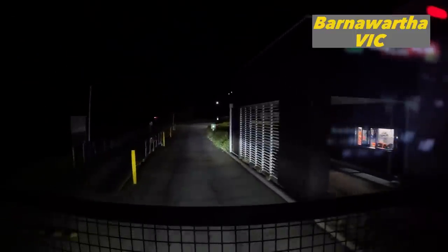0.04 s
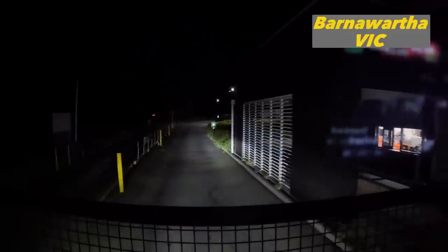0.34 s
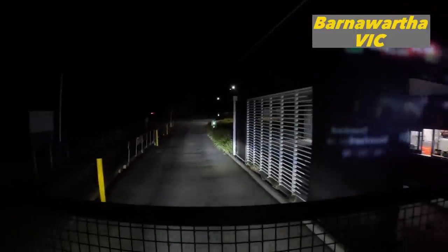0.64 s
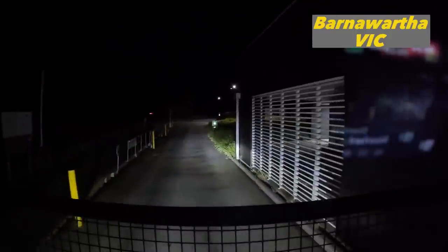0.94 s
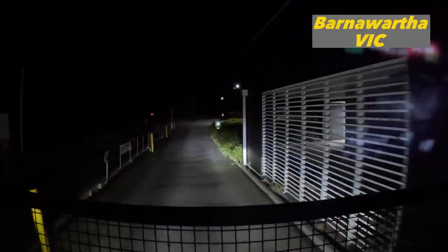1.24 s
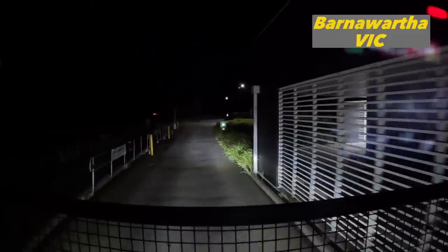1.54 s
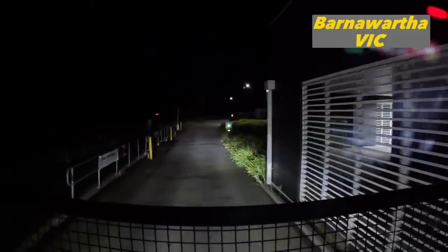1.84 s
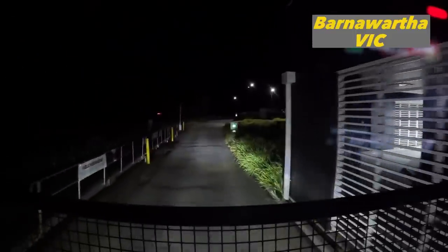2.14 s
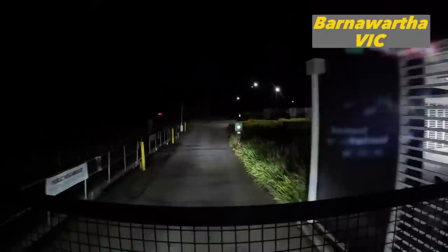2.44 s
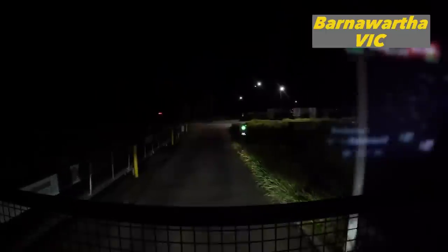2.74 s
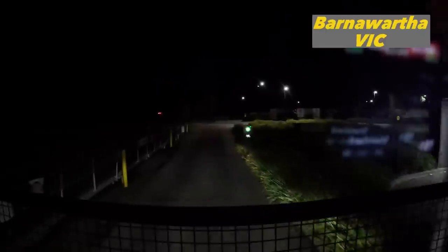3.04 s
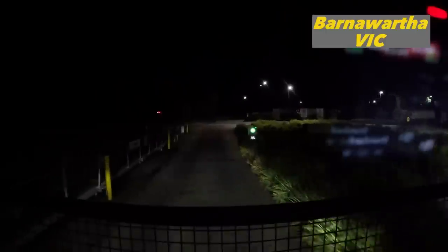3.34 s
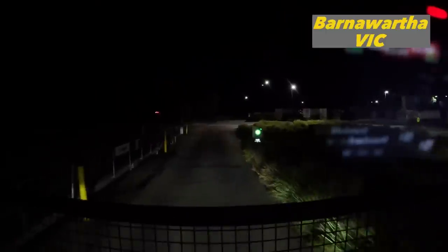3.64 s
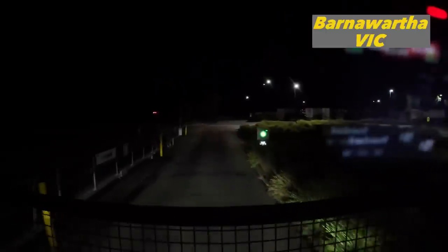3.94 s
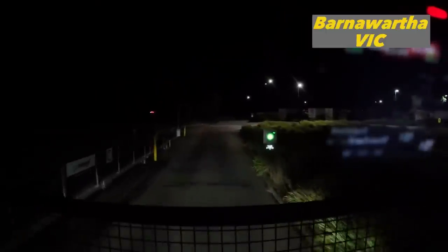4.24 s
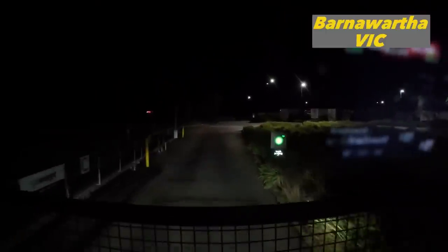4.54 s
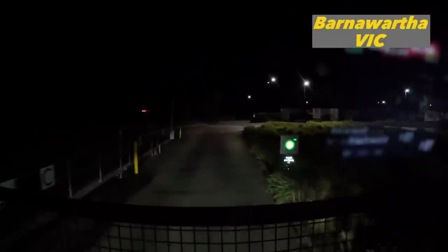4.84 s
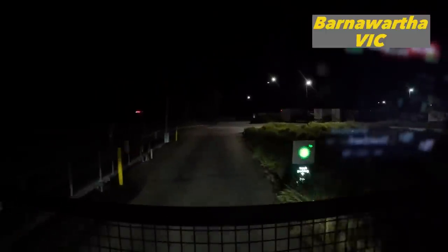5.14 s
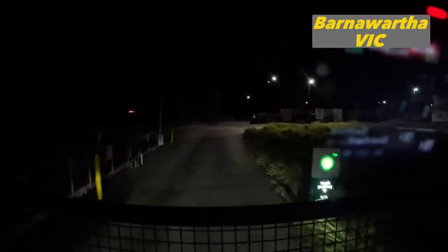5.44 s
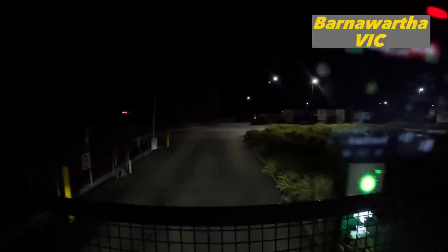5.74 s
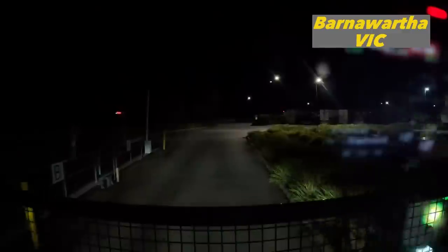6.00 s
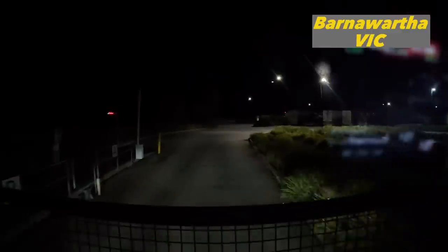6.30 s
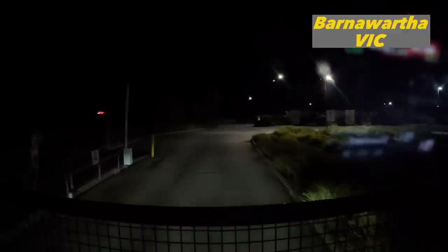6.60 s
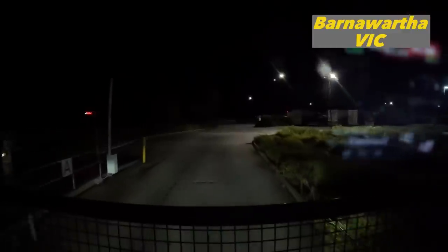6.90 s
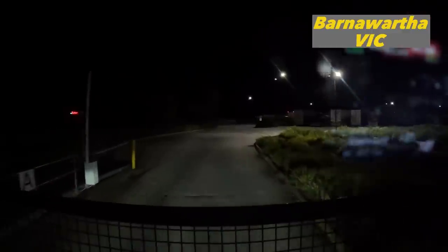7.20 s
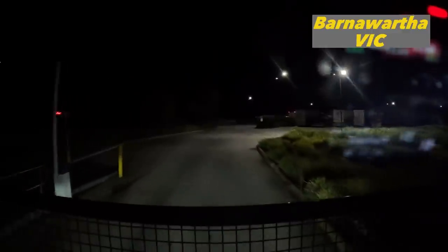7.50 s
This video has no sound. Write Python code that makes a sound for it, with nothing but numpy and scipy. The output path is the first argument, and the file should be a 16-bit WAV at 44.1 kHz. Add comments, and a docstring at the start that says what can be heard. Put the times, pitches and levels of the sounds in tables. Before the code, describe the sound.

Inside a slow-moving truck, a deep diesel hum rises slightly and grows more clattery, with light knocks and two short air hisses.

```python
"""Six-cylinder diesel of a heavy truck creeping along a yard road at night, heard in the cab.
It speeds up a little and clatters harder under load; firing pulses and gear whines excite cab resonances.
A second, governed engine (probably a cooling unit) drones steadily and beats against it.
Loose fittings click, knock and jingle as the cab sways; air hisses twice.
Late on, a low rumble and a faint whistle swell, something slides, and there is one thin squeak."""
import sys
import numpy as np
from scipy import signal
from scipy.fft import rfft, irfft, next_fast_len
from scipy.io import wavfile
from scipy.ndimage import uniform_filter1d, minimum_filter1d

SR = 44100
rng = np.random.default_rng(int(sys.argv[2]) if len(sys.argv) > 2 else 0)


def to_wav(s):
    """Save 16-bit WAV."""
    ch = np.atleast_2d(s).T  # columns
    pcm = np.round(np.clip(ch, -1, 1) * 32767)  # PCM
    wavfile.write(sys.argv[1], SR, pcm.astype(np.int16))


N = 337806
TIME_S = np.arange(N) / SR
BINS_HZ = np.maximum(np.fft.rfftfreq(next_fast_len(N), 1 / SR), 1)

# diesel firing rate, sagging as load comes on: t/s, f/Hz
FIRING_HZ = [(0, 64.33), (0.5, 64.42), (1.3, 65.95), (2.4, 66.42), (3.9, 68.9), (4.7, 69.7), (5.15, 68.7),
             (5.7, 69.85), (7.2, 68.4), (7.66, 68.5)]
# diesel load: t/s, load (0 light, about 1 full)
LOAD = [(0, 0.051), (.5, 0.24), (3.4, 0.1), (4, 0.069), (4.66, .06), (4.96, 0.97), (7.66, 1.08)]
# cab air resonances: firing multiple, f/Hz, width/Hz, level/dB, change at full load/dB
BOOM_MODES = [(1, 65.9, 1.1, -25.5, -3), (2, 128.7, 0.92, -29, -8.5), (2, 138.6, 1.7, -32, 1),
              (3, 197.2, 7.9, -27.5, -8), (4, 266.5, 8.3, -41.5, -5.5)]
# diesel tones: four-stroke cycle multiple, relative level/dB at low speed, at high speed
ENGINE_ORDERS = [(2, -31, -33), (3, -39, -40), (4, -34, -40), (7, -32, -32), (8, -35, -36), (9, -39, -36),
                 (10, -38, -36), (14, -38, -42), (15, -43, -48), (16, -39, -45), (20, -52, -50),
                 (22, -46, -48), (23, -46, -51), (25, -52, -50), (26, -52, -50), (27, -52, -58)]
LOW_FIRING_HZ, HIGH_FIRING_HZ = 66.27, 71.4
# gear and accessory whines: cycle multiple, resonance f/Hz, width/Hz, level/dB, change at full load/dB
WHINES = [(32, 345, 5, -48, 0), (35, 406, 16, -44.5, -0.5), (40, 433, 6, -44.5, 0), (45, 505, 7, -50.5, -3),
          (47, 550, 4, -55, 7), (56, 640, 12, -50.5, -4), (57, 664, 5, -52, 7), (63, 731, 7, -57, 10),
          (76, 848, 13, -52.5, -6), (90, 1032, 6, -63, 12), (98, 1135, 14, -63, 7.5),
          (114, 1301, 13, -63, 8)]
# knock per cylinder, in firing order: relative level/dB
CYLINDER_DB = [0, -4, -6, -3, -8, -7]
CYLINDERS = len(CYLINDER_DB)
# engine and road noise spectrum: f/Hz, level/dB at light load, at full load
ROAR_SPECTRUM = [(9.9, -55, -48), (20, -49, -31.5), (35, -49, -54.5), (74, -48.5, -51.5), (130, -54, -50),
                 (239, -59, -57.5), (382, -67, -64.5), (457, -67.5, -67), (820, -71, -68),
                 (1260, -76.5, -70.5), (2070, -83.5, -74.5), (2590, -95.5, -80.5), (3100, -95, -82.5),
                 (3830, -99, -89.5), (4200, -102, -99), (5370, -105.5, -102), (6600, -108, -105),
                 (9900, -113, -111), (10000, -121, -113), (15000, -140, -132)]
# cab panel peaks and dips on the roar: f/Hz, width/Hz, gain/dB
CAB_MODES = [(425, 14, 5), (500, 9, 4.5), (530, 12, -3), (635, 14, 4), (852, 14, 2), (932, 18, 3),
             (1288, 18, 2.5), (1372, 18, -3)]
# intake hiss, rising a little after the load: t/s, level/dB
INTAKE_DB = [(0, -67.5), (1.3, -67), (1.9, -77), (4.85, -71), (5.2, -62), (6.25, -63.5), (6.7, -59.5),
             (7.66, -61.5)]
# spectrum of intake hiss and slide: f/Hz, gain/dB
THIN_HISS_SPECTRUM = [(2000, -21), (4200, 0.5), (5500, 0), (7500, -8.5), (9800, -9.5), (11000, -18),
                      (14500, -28.5)]
# governed engine tones: firing multiple, level/dB
DRONE_ORDERS = [(0.5, -44), (1, -17.5), (2, -23), (2.5, -45.5), (3, -36.5), (3.5, -45.5), (4, -46.5)]
# hard plastic clicks: t/s, relative level/dB
CLICKS = [(0.462, -41.5), (0.9274, -47), (5.5972, -43), (7.4101, -42)]
# plastic resonances: f/Hz, width/Hz, gain/dB
CLICK_MODES = [(5460, 500, 7), (7100, 900, -2.5), (9000, 800, -6), (9800, 420, -8.5), (11700, 900, -13.5)]
# fitting knocks, levels relative: t/s, level/dB, t60/s, snap re level/dB, ring f/Hz, ring/dB, clack f/Hz
KNOCKS = [(0.598, -52, 0.19, -13, 745, -46, 3720), (0.9772, -55, 0.16, -12, 930, -43, 5600),
          (1.0355, -52, 0.13, -19, 796, -40, 4800), (1.305, -46.5, 0.091, -12, 853, -43, 4470),
          (1.853, -45.5, 0.22, -9.5, 1093, -37.5, 5500), (2.0125, -41, 0.18, -15, 710, -34, 8900),
          (2.029, -57.5, 0.11, -4, 917, -39, 6200), (2.063, -62, 0.09, -11, 1360, -46, 6900),
          (2.552, -45.5, 0.19, -9.5, 1097, -42, 6350), (2.586, -48, 0.14, -9, 745, -34.5, 6360),
          (2.695, -42.5, 0.11, -9, 686, -36.5, 4970), (2.708, -49, .14, -6, 1010, -37, 9100),
          (2.7435, -50.5, 0.18, -23, 673, -39, 2600), (2.806, -58, .1, -8, 890, -47, 5600),
          (3.282, -48, 0.089, -18, 1112, -36.5, 2300), (4.441, -47, 0.14, -16, 1090, -42, 4850),
          (4.722, -54, 0.2, -20, 920, -47, 3300), (4.758, -52, 0.24, -24, 647, -34.5, 4400),
          (4.827, -49.5, 0.25, -9, 1000, -46, 3900), (6.0432, -47, 0.086, -20, 1120, -48, 4640)]
# dull body of a knock: f/Hz, gain/dB
KNOCK_SPECTRUM = [(400, 0.5), (1200, 16.5), (2500, 8), (3500, 3), (5000, 1.5), (6500, -6.5), (8500, -17),
                  (11500, -26.5), (14500, -31.5)]
# bright snap of a knock: f/Hz, gain/dB
SNAP_SPECTRUM = [(3500, -25), (6000, 1), (8000, 0.5), (9600, -1.5), (11000, -12), (14500, -16)]
# hollow panel rung by the knocks: f/Hz, width/Hz, gain/dB
PANEL_MODES = [(720, 35, 0), (926, 30, -8), (1120, 45, -8), (1410, 45, -11), (2450, 200, -15)]
# jingles of a small metal part: t/s, relative level/dB
JINGLES = [(0.9, -54), (3.0135, -55), (3.7559, -52), (3.8526, -48), (4.4144, -49.5), (4.6967, -49),
           (5.2919, -47)]
# its resonances: f/Hz, width/Hz, gain/dB
JINGLE_MODES = [(5800, 450, -5), (7480, 260, -1.5), (9300, 500, -15), (11900, 700, -21)]
# air puffs: centre t/s, level/dB
PUFFS = [(3.15, -55), (3.455, -49)]
# puff spectrum: f/Hz, gain/dB
PUFF_SPECTRUM = [(1000, -17), (2200, 6.5), (3600, -1), (4700, -6), (5400, -10), (6500, -12), (7600, -7),
                 (8900, -16), (9800, -8.5), (11000, -20.5), (14500, -25)]
# whistling resonances in a puff: f/Hz, width/Hz, gain/dB
PUFF_MODES = [(2240, 50, 12), (4070, 70, 9), (5300, 160, 3.5)]
# bands of tyre rumble and whistle (probably the turbocharger): f/Hz, width/Hz, level/dB
RUSH_BANDS = [(232, 130, -34.5), (1311, 28, -47), (1485, 70, -53)]
# sliding object: centre t/s, length/s, level/dB
SLIDE = (6.71, .1, -57.5)
# squeak: centre t/s, sigma/s, f/Hz, width/Hz, left level/dB
SQUEAK = (7.5, .035, 13800, 1000, -63)
# cab diffuseness: f/Hz, side minus mid/dB
SIDE_DB = [(60, -13), (100, -15), (180, -14.5), (320, -15), (550, -13), (950, -12), (1660, -12),
           (2880, -5.5)]
# microphone sensitivity: f/Hz, left minus right/dB
BALANCE_DB = [(60, -0.5), (110, -0.5), (220, -0.5), (420, 0.0), (790, 0.5), (1510, 0.5), (2880, -1.5)]


def from_db(db):
    """Decibels to gain."""
    return 10 ** (np.asarray(db) / 20)


def unit_rms(x):
    """Scale to rms 1."""
    return x / np.sqrt(np.mean(x ** 2) + 1e-20)


def curve(rows):
    """Value per sample from (t/s, value) rows."""
    return np.interp(TIME_S, *np.transpose(rows))


def slopes(points):
    """Gain per bin from (f/Hz, gain/dB) points."""
    hz, db = np.transpose(points)
    return from_db(np.interp(np.log(BINS_HZ), np.log(hz), db))


def resonances(modes):
    """Gain per bin from (f/Hz, width/Hz, gain/dB) peaks."""
    return sum(from_db(db) / (1 + ((BINS_HZ - hz) / width_hz) ** 2) for hz, width_hz, db in modes)


def on_resonance(hz, centre_hz, width_hz):
    """Gain of a tone near a resonance; 1 at the centre."""
    return 1 / np.sqrt(1 + ((hz - centre_hz) / width_hz) ** 2)


def colour(x, gain):
    """Filter by a gain per bin."""
    return irfft(rfft(x, next_fast_len(N)) * gain, next_fast_len(N))[..., :N]


def drift(rate_hz):
    """Low-passed random wander, rms 1."""
    hop, settle = 100, 2000
    pole = np.exp(-2 * np.pi * rate_hz * hop / SR)
    white = rng.standard_normal(N // hop + settle + 2)
    slow = signal.lfilter([1], [1, -2 * pole, pole * pole], white)[settle:]
    return np.interp(np.arange(N) / hop, np.arange(len(slow)), unit_rms(slow))


def in_cab(mid):
    """Reflections make left and right of a white noise differ, most in the treble."""
    side = colour(rng.standard_normal(N), slopes(SIDE_DB))
    return np.array([mid + side, mid - side])


def cab_noise(gain):
    """Coloured stereo noise spread by the cab, rms 1."""
    return unit_rms(colour(in_cab(rng.standard_normal(N)), gain))


def firing_boom(firing_rad, firing_hz, flutter_db=1.5):
    """Four firing harmonics of alternating sign; each booms on a cab air resonance."""
    out = np.zeros(N)
    for order, hz, width_hz, db, load_db in BOOM_MODES:
        level_db = db + load_db * curve(LOAD) + flutter_db * drift(1.6)
        gain = from_db(level_db) * on_resonance(order * firing_hz, hz, width_hz)
        out -= gain * (-1) ** order * np.sin(order * firing_rad)
    return np.sqrt(2) * out


def engine_tones(cycles, firing_hz, wander_cycles=0.0013, gain_db=2.07):
    """Boom plus the other cycle multiples, from unequal cylinders; speed shifts their balance."""
    speed = np.clip((firing_hz - LOW_FIRING_HZ) / (HIGH_FIRING_HZ - LOW_FIRING_HZ), 0, 1)
    cycle_rad = 2 * np.pi * (cycles + wander_cycles * drift(1.3))   # uneven crank
    out = firing_boom(CYLINDERS * cycle_rad, firing_hz)
    for order, low_db, high_db in ENGINE_ORDERS:
        level_db = low_db + speed * (high_db - low_db) + gain_db
        out += np.sqrt(2) * from_db(level_db) * np.cos(order * cycle_rad + rng.uniform(0, 2 * np.pi))
    return out


def gear_whines(cycles, firing_hz, flutter_db=0.5, play_cycles=0.0012):
    """Whines swell through their resonances and vary with load; gear play blurs the high ones most."""
    out, load = np.zeros(N), curve(LOAD)
    for order, hz, width_hz, db, load_db in WHINES:
        level_db = db + load_db * load + flutter_db * drift(9.3)
        gain = from_db(level_db) * on_resonance(order * firing_hz / CYLINDERS, hz, width_hz)
        out += gain * np.cos(2 * np.pi * order * (cycles + play_cycles * drift(11)))
    return np.sqrt(2) * out


def engine_roar(cycles, repeat_share=0.26, knock_depth=0.54, decay_firings=0.7, crossover_hz=280):
    """Each firing throws a burst of clatter over the rumble; part of it repeats every cycle."""
    position = cycles % 1
    one_cycle = rng.standard_normal(int(CYLINDERS * SR / LOW_FIRING_HZ))
    repeating = one_cycle[(position * len(one_cycle)).astype(int)]
    white = np.sqrt(repeat_share) * repeating + np.sqrt(1 - repeat_share) * rng.standard_normal(N)
    cylinder, age_firings = np.divmod(position * CYLINDERS, 1)
    knock = knock_depth * from_db(CYLINDER_DB)[cylinder.astype(int)]
    bursts = unit_rms(1 + knock * np.exp(-age_firings / decay_firings))
    treble_share = 1 / (1 + (crossover_hz / BINS_HZ) ** 4)
    clatter = colour(in_cab(white) * bursts, np.sqrt(treble_share))
    rumble = colour(in_cab(rng.standard_normal(N)), np.sqrt(1 - treble_share))
    panels = from_db(sum(db / (1 + ((BINS_HZ - hz) / width_hz) ** 2) for hz, width_hz, db in CAB_MODES))
    hz, light_db, full_db = np.transpose(ROAR_SPECTRUM)
    light, full = (colour(clatter + rumble, panels * slopes(np.c_[hz, db])) for db in (light_db, full_db))
    return np.sqrt(SR / 2) * (light + curve(LOAD) * (full - light))


def intake_hiss():
    """Thin hiss of intake air."""
    return from_db(curve(INTAKE_DB)) * cab_noise(slopes(THIN_HISS_SPECTRUM))


def governed_engine(firing_hz=63.7, flutter_db=0.83, wander_firings=0.001):
    """Four cylinders held at one speed: a deep, nearly pure drone."""
    firing_rad = 2 * np.pi * (firing_hz * TIME_S + wander_firings * drift(3.1))
    tones = (from_db(db + flutter_db * drift(14)) * np.sin(order * firing_rad)
             for order, db in DRONE_ORDERS)
    return np.sqrt(2) * sum(tones)


def contacts(rows, gain, rise_s, crack=0.0, crack_s=0.0036, flutter_db=0.1):
    """Noise bursts dying away in the cab, with optional crack; rows: t/s, level/dB, t60/s."""
    envelope = np.zeros(N)
    for t_s, db, t60_s in rows:
        first = int((t_s - rise_s) * SR)
        age_s = TIME_S[:min(N - first, SR // 2)]
        decay = from_db(-60 * age_s / t60_s) + crack * np.exp(-age_s / crack_s)
        envelope[first:first + len(age_s)] += from_db(db) * (1 - np.exp(-age_s / rise_s)) * decay
    return envelope * unit_rms(from_db(flutter_db * drift(130))) * cab_noise(gain)


def plastic_clicks(gain_db=-7, t60_s=0.12):
    """Hard plastic parts tap and ring briefly."""
    hits = [(t_s, db + gain_db, t60_s) for t_s, db in CLICKS]
    return contacts(hits, resonances(CLICK_MODES), rise_s=0.0027)


def fitting_knocks(body_db=5, panel_db=-2.5, panel_t60_s=0.13):
    """Loose fittings strike: dull body, bright snap and a shared ringing panel."""
    bodies = [(t_s, db + body_db, t60_s) for t_s, db, t60_s, *_ in KNOCKS]
    snaps = [(t_s, db + snap_db, t60_s) for t_s, db, t60_s, snap_db, *_ in KNOCKS]
    panel_hits = [(t_s, ring_db + panel_db, panel_t60_s) for t_s, *_, ring_db, _ in KNOCKS]
    return (contacts(bodies, slopes(KNOCK_SPECTRUM), rise_s=0.0016, crack=1.2, crack_s=0.004)
            + contacts(snaps, slopes(SNAP_SPECTRUM), rise_s=0.0012, crack=1.7, crack_s=0.0034)
            + contacts(panel_hits, resonances(PANEL_MODES), rise_s=0.0016))


def fitting_rings(gain_db=-1, t60_s=0.24):
    """Each struck fitting rings at its own hollow pitch."""
    out, age_s = np.zeros(N), TIME_S[:SR // 2]
    decay = from_db(-60 * age_s / t60_s)
    for t_s, *_, hz, db, _ in KNOCKS:
        first = int(t_s * SR)
        out[first:first + len(age_s)] += from_db(db + gain_db) * decay * np.sin(2 * np.pi * hz * age_s)
    return out


def fitting_clacks(gain_db=-4, width_hz=450, t60_s=0.072, rise_s=0.002):
    """Each fitting's hard edge buzzes briefly at its own high pitch."""
    out, age_s = np.zeros((2, N)), TIME_S[:SR // 2]
    envelope = (1 - np.exp(-age_s / rise_s)) * from_db(-60 * age_s / t60_s)
    for t_s, db, *_, hz in KNOCKS:
        band = signal.iirpeak(hz, hz / width_hz, fs=SR)
        mid, side = unit_rms(signal.lfilter(*band, rng.standard_normal((2, len(age_s)))))
        buzz = np.array([mid + side / 2, mid - side / 2])
        first = int(t_s * SR)
        out[:, first:first + len(age_s)] += from_db(db + gain_db) * envelope * buzz
    return out


def metal_jingles(gain_db=-7, t60_s=0.2):
    """A small shaken metal part rings in its high modes."""
    hits = [(t_s, db + gain_db, t60_s) for t_s, db in JINGLES]
    return contacts(hits, resonances(JINGLE_MODES), rise_s=0.0012)


def air_puffs(length_s=0.18, rasp_db=0.5):
    """Air rasps through a few resonances, perhaps in the valve of an air-sprung seat."""
    envelope = sum(from_db(db) * np.exp(-np.abs(2 * (TIME_S - t_s) / length_s) ** 3) for t_s, db in PUFFS)
    rasp = unit_rms(from_db(rasp_db * drift(55)))
    return envelope * rasp * cab_noise(slopes(PUFF_SPECTRUM) + resonances(PUFF_MODES))


def rush(start_s=5.85, build_s=0.95):
    """A low rumble and a faint whistle swell late on, under load, then hold."""
    bands = sum(from_db(db) * cab_noise(resonances([(hz, width_hz, 0)]) ** 2)
                for hz, width_hz, db in RUSH_BANDS)
    return np.clip((TIME_S - start_s) / build_s, 0, 1) * bands


def slide(grain_db=4):
    """A loose object slides briefly, catching and slipping."""
    t_s, length_s, db = SLIDE
    envelope = from_db(db) * np.exp(-(2 * (TIME_S - t_s) / length_s) ** 2)
    grain = unit_rms(from_db(grain_db * drift(90)))
    return envelope * grain * cab_noise(slopes(THIN_HISS_SPECTRUM))


def squeak(right_db=-12):
    """A brief, very high rub on the left."""
    t_s, sigma_s, hz, width_hz, db = SQUEAK
    envelope = from_db(db) * np.exp(-0.5 * ((TIME_S - t_s) / sigma_s) ** 2)
    rub = unit_rms(colour(rng.standard_normal(N), resonances([(hz, width_hz, 0)]) ** 2))
    return envelope * rub * from_db([[0], [right_db]])


def limiter(x, ceiling=0.44, hold_s=0.048):
    """Soft-knee gain dip around each peak near the ceiling."""
    size = int(hold_s * SR)
    allowed = (1 + (np.abs(x).max(axis=0) / ceiling) ** 6) ** (-1 / 6)
    return x * uniform_filter1d(minimum_filter1d(allowed, size), size)


def scene():
    """Both engines and the cab noises, heard from the dashboard."""
    firing_hz = curve(FIRING_HZ)
    cycles = np.cumsum(firing_hz) / SR / CYLINDERS
    diesel = engine_tones(cycles, firing_hz) + gear_whines(cycles, firing_hz) + engine_roar(cycles)
    engines = diesel + intake_hiss() + governed_engine()
    rattles = plastic_clicks() + fitting_knocks() + fitting_rings() + fitting_clacks() + metal_jingles()
    return engines + rattles + air_puffs() + rush() + slide() + squeak()


def record(dry):
    """Two slightly unlike microphones, subsonic cut, limiter, end fades, top cut."""
    low_cut_hz, high_cut_hz, fade_s = 8, 15000, 0.008
    tilt = np.sqrt(slopes(BALANCE_DB))
    high_pass = 1 / (1 + (low_cut_hz / BINS_HZ) ** 4)
    mics = colour(dry, np.array([tilt, 1 / tilt]) * high_pass)
    edge_s = np.minimum(TIME_S, TIME_S[::-1])
    fade = np.sin(np.pi / 2 * np.clip(edge_s / fade_s, 0, 1)) ** 2
    low_pass = signal.ellip(10, 0.1, 80, high_cut_hz, fs=SR, output="sos")
    return signal.sosfilt(low_pass, limiter(mics) * fade)


dry = scene()
out = record(dry)
to_wav(out)
```